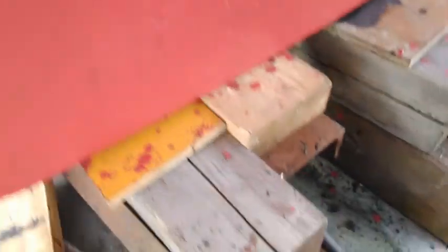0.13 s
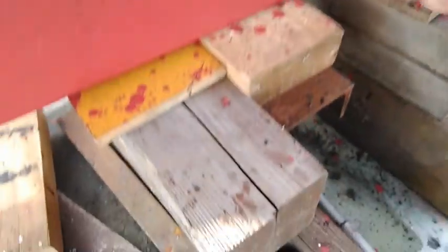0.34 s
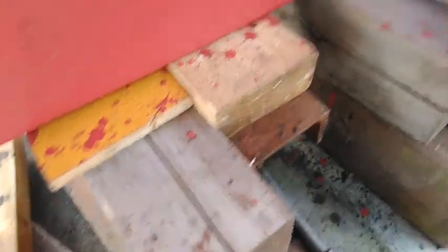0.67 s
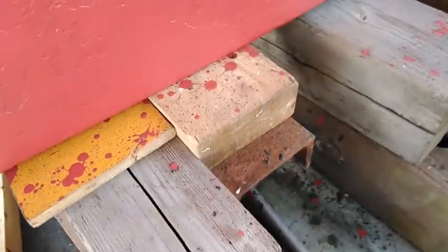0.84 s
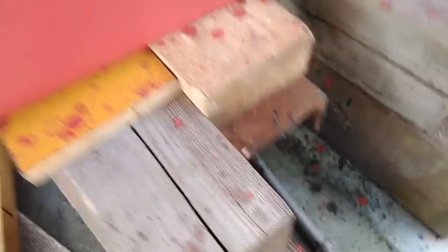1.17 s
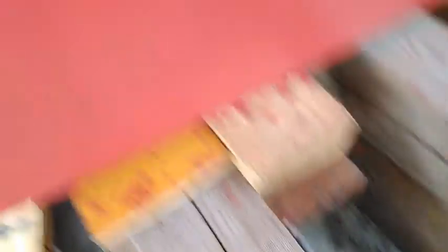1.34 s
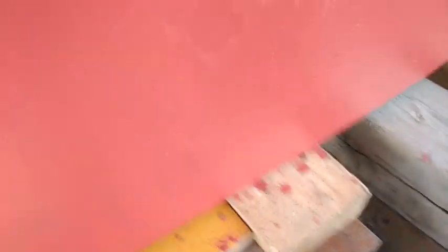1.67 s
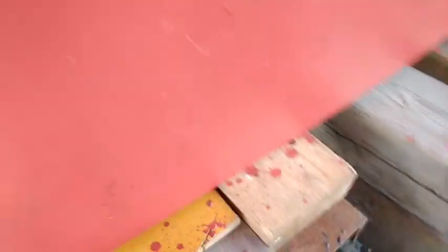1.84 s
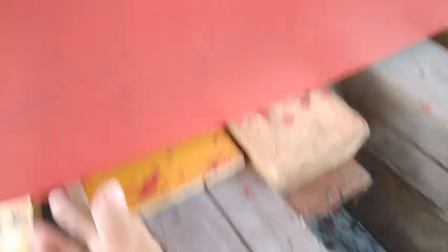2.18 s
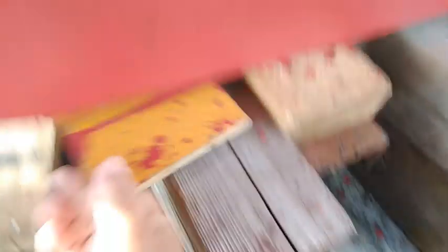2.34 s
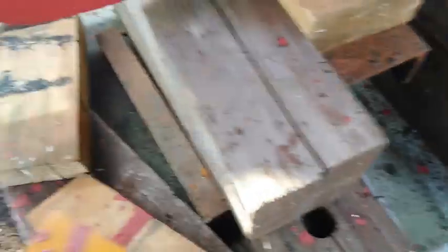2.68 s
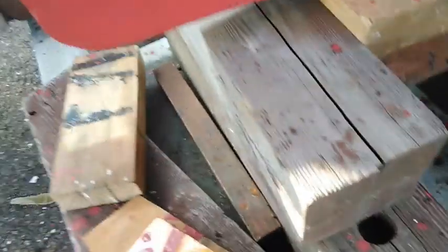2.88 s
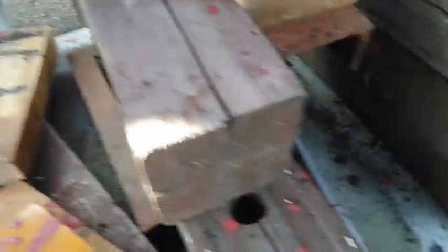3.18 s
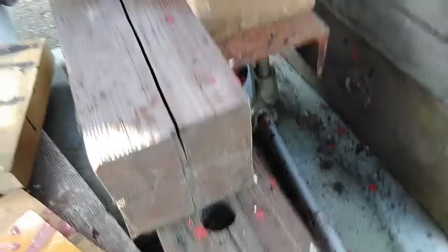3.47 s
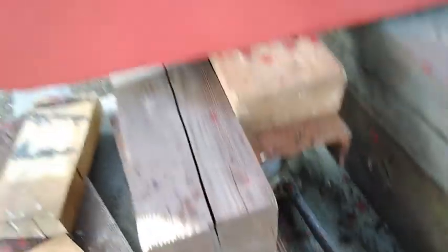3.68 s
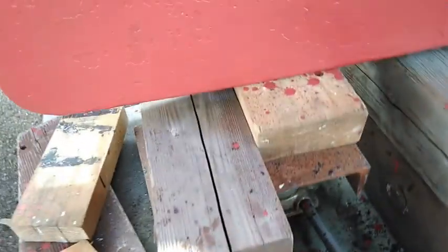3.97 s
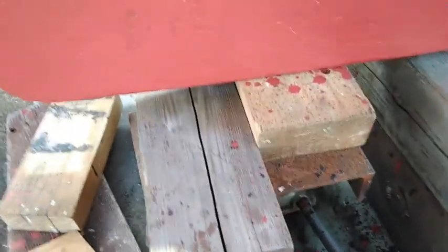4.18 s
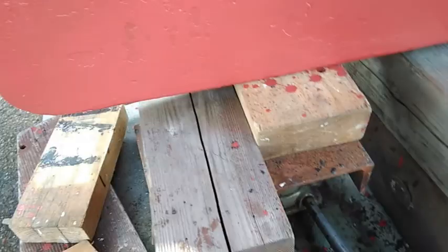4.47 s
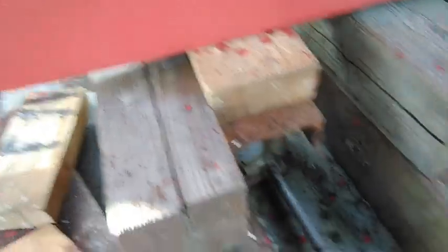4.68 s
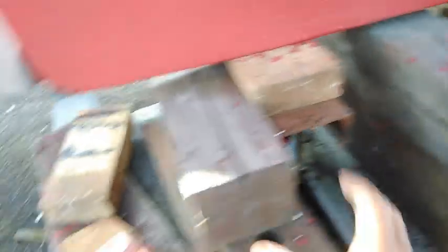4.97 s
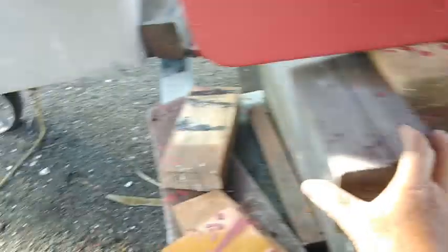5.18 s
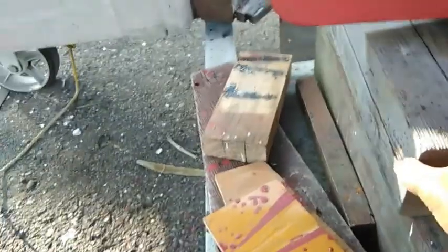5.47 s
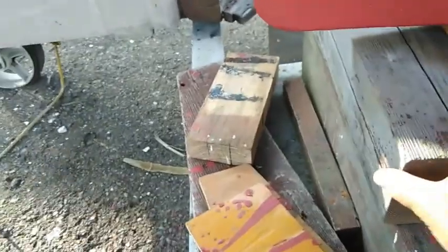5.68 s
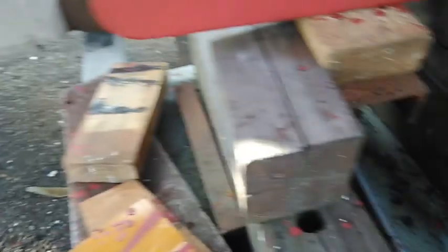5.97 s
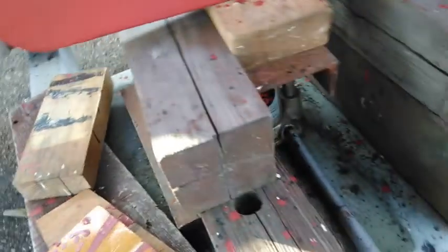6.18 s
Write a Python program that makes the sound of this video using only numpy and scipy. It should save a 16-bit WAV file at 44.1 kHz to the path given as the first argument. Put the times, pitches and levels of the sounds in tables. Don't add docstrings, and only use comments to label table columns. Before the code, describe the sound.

Close up in an open yard with faint traffic hum, wood grates in a short gritty slide, then two pairs of wooden knocks follow. Another scrape leads to a lighter knock and two loud, sharp cracks. After a pause with tiny taps, a block drops hard, bouncing in quickening clacks while a loose steel bolt pings. Soft low handling bumps close it.

```python
import sys
import numpy as np
from scipy import signal
from scipy.fft import rfft, irfft, next_fast_len
from scipy.io import wavfile
from scipy.ndimage import uniform_filter1d

SR = 44100
rng = np.random.default_rng(int(sys.argv[2]) if len(sys.argv) > 2 else 0)


def field_ratio(decibels):
    return 10 ** (np.asarray(decibels, dtype=float) / 20)


def generate_wav(signal):
    frames = np.transpose(np.atleast_2d(signal))
    scaled = np.clip(frames, -1, 1) * 32767
    pcm = np.round(scaled).astype(np.int16)
    wavfile.write(sys.argv[1], SR, pcm)


N = 279153

# frequency in Hz, level in dB per Hz.
YARD_SPECTRUM = [(15, -53.5), (25, -33), (48, -18), (62, -2), (82, -1), (168, -6.5), (355, -21.5),
                 (389, -16.5), (448, -22), (782, -20), (3160, -33.5), (3630, -36), (4920, -35.5),
                 (6500, -46.5), (8450, -81.5), (14300, -120)]
# time in seconds, level in dB.
TRAFFIC_SWELL = [(0, 2), (1.35, 0.5), (2.5, 1.5), (4.599, 1), (5.051, 4.5), (5.7, 3.5), (6.33, 3)]
HUM_DB, AIR_DB, AIR_SWELL = -68, -80, 1.5

# time in seconds, peak in dB, pitch in Hz, t60 in seconds.
SNAGS = [(0.029, -45.5, 1310, 0.033), (0.436, -51, 5400, 0.027), (0.469, -41, 4870, 0.023),
         (0.479, -36, 5010, 0.044), (0.507, -46, 3100, 0.037), (0.541, -37, 3100, 0.058),
         (0.595, -31, 870, 0.018), (0.578, -28, 2170, 0.034), (0.633, -25.5, 1600, 0.04),
         (0.658, -23, 1255, 0.043), (0.677, -38.5, 2170, 0.05), (0.966, -49, 3400, 0.045),
         (1.023, -56.5, 4600, 0.031), (2.042, -37, 2090, .03), (2.091, -36, 3960, 0.021),
         (2.138, -33.5, 2400, 0.033), (2.106, -28.5, 4480, 0.03), (2.17, -37, 1700, 0.027),
         (2.214, -42, 1690, 0.058), (2.226, -47, 4540, 0.027), (2.242, -47, 1580, 0.12),
         (4.195, -34.5, 2650, 0.025), (4.203, -37.5, 1200, 0.053), (4.216, -45, 1475, 0.052)]
# time in seconds,
# peak in dB, pitch in Hz, t60 in seconds.
CHIPS = [(1.691, -52.5, 2600, 0.035), (3.968, -50, 1430, 0.089), (1.779, -55.5, 462, 0.08),
         (2.008, -34, 1912, 0.04), (3.62, -61, 877, 0.081), (3.752, -58, 4590, 0.054),
         (3.753, -54.5, 3735, 0.14), (3.757, -66, 1303, 0.25), (3.966, -40.5, 2750, 0.025),
         (3.9675, -44, 1820, 0.058), (4.044, -46, 725, 0.045), (4.061, -58, 915, 0.064),
         (4.188, -45.5, 2693, 0.03), (4.198, -42.5, 1860, 0.085), (4.228, -55, 1700, 0.07),
         (4.255, -56, 1650, 0.058), (4.29, -60, 1750, .08), (2.951, -26, 740, 0.045), (2.82, -42, 820, .1),
         (4.097, -59, 513, 0.041), (2.39, -50, 800, 0.065), (2.418, -50, 806, 0.097),
         (2.415, -48, 2092, 0.062), (4.529, -65, 731.5, 0.038), (4.6942, -47, 5080, 0.053),
         (5.455, -59, 1760, 0.03), (5.47, -64, 2200, .03)]
# time in seconds, peak in dB, pitch in Hz, t60 in seconds.
CLINKS = [(4.7035, -7, 4980, .045), (4.7895, -10, 4130, .03), (4.79, -21, 6313, .03),
          (4.8428, -14.5, 2850, 0.037), (4.8768, -22.5, 5050, 0.02525), (4.8775, -30.5, 7600, .025),
          (4.9003, -24, 4460, 0.023), (4.901, -30.5, 6200, 0.022), (4.9168, -34.5, 7860, .05),
          (4.9172, -29, 3600, 0.046), (4.9395, -44, 4870, 0.021)]
SNAG_CLICK_DB, CHIP_CLICK_DB, CLINK_CLICK_DB = -4, -11, -9.5

# time in seconds, peak in dB, pitch in Hz, length in cycles.
BUMPS = [(0.169, -31.5, 90, 0.88), (0.196, -47.5, 71, 2.5), (0.383, -40.5, 261, 2.9),
         (0.411, -52.5, 180, 16), (2.434, -36, 173, 7.6), (2.458, -43, 173, 6.1), (2.48, -47.5, 185, 2.8),
         (2.373, -37, 198, 3.2), (2.412, -39.5, 275, 4.4), (2.431, -43.5, 320, 7.1),
         (5.613, -36.5, 81, 1.85), (5.637, -34, 153.1, 2.2), (5.653, -30, 70.6, 1.25),
         (5.717, -34, 86, 1.03), (5.764, -47, 80.1, 3.9), (5.812, -48, 104.6, 4.4),
         (5.87, -26.5, 100.9, 2.4), (5.868, -33.5, 190, 1.56), (5.881, -45.5, 260, 1.25),
         (0.648, -48.5, 168, 31), (1.151, -45, 178.5, 10.8), (5.906, -34, 100.4, 1.34),
         (1.791, -57, 289.5, 6.1), (2.209, -54, 314, 5.1)]

# frequency in Hz, width in Hz, level in dB.
SLIDE_MODES = [(463, 32, 1), (770, 75, -13), (895, 23, 1), (1154, 99, 4), (1650, 100, -1.5),
               (2170, 47, 3.5), (3073, 220, -6), (3440, 31, -24.5), (3794, 49, -20.5), (5060, 540, 0)]
# frequency in Hz, level in dB per Hz.
GRIT_SPECTRUM = [(71, -48), (120, -15), (169, -2), (403, -11.5), (465, -4.5), (1000, -12), (1200, -17.5),
                 (3100, -14), (9620, -29), (13800, -37.5), (15000, -60)]
# time in seconds, level in dB.
PUSH = [
    (0.43, -73),
    (0.44, -63.5),
    (0.484, -47),
    (0.55, -42.5),
    (0.582, -38),
    (0.61, -45),
    (0.664, -38.5),
    (0.684, -45),
    (0.702, -63),
]
PULL = [
    (1.96, -86),
    (1.99, -62.5),
    (2.012, -55),
    (2.05, -45),
    (2.142, -44),
    (2.166, -54.5),
    (2.2, -60),
    (2.245, -58.5),
    (2.3, -75),
]
# hollow low modes in dB, body modes in dB, grit in dB,
# growth of the low layers as weight settles in dB per second.
PUSH_ON = (-13.5, -15.5, -19.5, 53.5)
PULL_ON = (-46, -1, -16, -16)
# start in seconds, length in seconds, level in dB, low modes in dB, grit in dB.
BRUSHES = [(0.43, 0.063, -72.5, -21, -20), (0.707, 0.19, -68, -4.5, -14), (0.98, 0.089, -61, -9, -12),
           (1.1, .035, -71, -10, -5.5), (0.78, 0.016, -69.5, -6.5, -0.5), (2.355, .06, -52, 4, -13.5),
           (1.9, .11, -63, -4, -13), (5.0, 0.32, -74.5, 2, -30), (4.704, 0.095, -53.5, -19.5, 6),
           (4.792, 0.17, -56.5, -19, 3), (2.755, 0.11, -63.5, -30.5, -17.5),
           (5.635, 0.066, -64.5, -3.5, -9.5), (5.687, 0.064, -70, -6, 1), (5.75, 0.1, -81, -6, -2.5),
           (8.6, 0.065, -76.5, 3.5, -25), (4.6, .05, -76, 12.5, -25), (3.975, 0.11, -72.5, -7, -28),
           (2.925, 0.066, -54.5, -30, -25), (2.5, .045, -68.5, -32, -16.5)]
GRIP_DB = -8.5
BRUSH_RISE_S, BRUSH_FADE_DB = 0.0092, -11.5

# time in seconds, peak in dB, hardness as treble tilt in dB per octave,
# ring time factor, first crack over the ring in dB.
WEDGE_KNOCKS = [
    (.8875, -14.5, 2, 1.08, 4.5),
    (.8955, -21.5, 1.5, 0.57, 2.5),
    (.908, -26, -5, 0.72, 6),
    (.924, -31, -8, 1.2, 2.5),
]
BEAM_KNOCKS = [
    (1.0565, -14, -0.5, 1, 1),
    (1.0615, -14, -1, 0.87, 0),
    (1.078, -26, -3, 1, 0),
    (1.092, -28.5, -6, 0.88, 0.069),
    (1.109, -35, -2.5, 1, 0),
]
SHIM_KNOCKS = [
    (2.3205, -19, -0.5, 0.82, 5.7),
    (2.3295, -21.5, 0, 0.91, 4),
    (2.344, -24, 0.8, 1, 3.2),
    (2.361, -30, -2.5, 0.87, 2.3),
    (2.378, -48, -0.5, 0.74, 2.7),
    (2.414, -54, -22, 1, 3.4),
]
PLANK_KNOCKS = [
    (2.7438, -1.5, 1.5, 1, 6.9),
    (2.766, -23.5, -2, .8, 2),
    (2.777, -26.5, -5, .8, 2.1),
    (2.7925, -23, -5, .6, 2.5),
    (2.81, -39.5, -0.5, .6, 2),
]
BLOCK_KNOCKS = [
    (2.9186, -24.5, -4, .4, 2),
    (2.92, -3, 2, 0.87, 6.3),
    (2.9312, -17.5, -2.5, 0.98, 2),
    (2.9425, -23, -2, 0.86, 1),
    (2.952, -26, -3, 0.83, 1),
]
DROP_KNOCKS = [
    (4.7038, -1.5, 3, 1.6, 3.1),
    (4.7085, -5, 0, 1.2, 2),
    (4.7145, -4, 0, 1.33, 2.3),
    (4.7275, -12.5, 0.5, 2.3, 2),
    (4.744, -16.5, -1, 1.5, 1),
    (4.758, -22, 0.5, 1.9, 1),
]
STACK_KNOCKS = [
    (4.7893, -4.5, 2.5, 1.67, 2.6),
    (4.797, -10, -1.5, 2.5, 1),
    (4.807, -14, -2, 1.6, 1),
    (4.8425, -4.5, 5.5, 1.36, 2.2),
    (4.853, -14, -0.5, 1.37, 1.2),
    (4.8765, -12.5, 1, 2.7, 2.1),
    (4.9003, -16.5, -2, 1.76, 1.9),
    (4.9175, -18, -1.5, 1.55, 1),
    (4.9395, -22.5, -3, 0.95, 2.7),
    (4.953, -28, -5.5, 1, 2.6),
]

# frequency in Hz, level in dB, t60 in seconds.
WEDGE_MODES = [(197.6, -28, 0.23), (436, -4, .1), (540, -13, .22), (597, -9.5, 0.24), (738, -11, .2),
               (870, 4, .05), (1160, 2, 0.068), (1274, -9, .06), (1700, -9.5, 0.078), (2200, -17, 0.06),
               (2400, -26, 0.058)]
BEAM_MODES = [(467.4, -10, 0.14), (586, -32.5, 0.23), (741.7, 12, 0.081), (816, -16, 0.074),
              (1160, -5.5, 0.06), (883, -9, 0.09), (1580, -4.5, .04), (2010, -5.5, 0.028),
              (2473, -26.5, 0.054)]
SHIM_MODES = [(450, 1.5, 0.067), (838.5, -9, .07), (1079, -8.5, 0.079), (1590, 3, 0.0407),
              (1879, -7.5, .05), (2270, -5, 0.073), (3310, -26, 0.09), (3930, -15, 0.069),
              (4560, -13, 0.049)]
PLANK_MODES = [(320, -15.5, 0.19), (614, -14, .18), (749, -13, .15), (822, -21.5, .3), (1048, -13, .13),
               (1230, -6.5, .11), (1275, 9, 0.065), (1396, -2.5, 0.035), (1992, 3.5, .025),
               (2230, -1, 0.04), (3200, -24, .08), (3900, -25, .08)]
BLOCK_MODES = [(330, -11, 0.1), (590, -14, 0.17), (705, -6.5, .12), (816, -8, 0.29), (1023, 8, 0.062),
               (1100, -9.5, .1), (1242, 0, 0.079), (1400, -4.5, .07), (1520, -5, 0.055), (1840, 0.5, 0.072),
               (2143, 3.5, 0.027), (2530, -12.5, .06), (3650, -14, .06)]
DROP_MODES = [(436.2, -4, .25), (545.7, -7.5, 0.14), (725, -4.5, .12), (903, -5, 0.13), (973.7, 2, .25),
              (1196, -2, 0.16), (1420, 1.5, .14), (1636, -6, .15), (1890, -6.5, 0.19), (2074, -5, .11),
              (2350, -11, .16), (3019, -14, .12), (3564, -8, .09), (5000, -7.5, .06)]
STACK_MODES = [(442.8, -3.5, 0.24), (492, -8.5, 0.26), (702.4, -2, 0.11), (897, -5.5, 0.15), (982, 2, 0.3),
               (1178, -6, 0.14), (1416, -0.5, 0.1005), (1600, -9.5, 0.093), (1685, -7.5, 0.13),
               (1807, -10, 0.16), (2064, -11.5, 0.14), (2724, -8.5, 0.12), (2995, -16, .1),
               (4000, -8.5, 0.04)]
# frequency in Hz, level in dB per Hz.
WEDGE_COLOUR = [(47, -50.5), (80, 0.5), (584, 9), (1000, 4.5), (1190, -16), (1760, -18.5), (1960, -30),
                (2230, -16.5), (2650, -23), (14000, -64)]
BEAM_COLOUR = [(47, -59), (80, -22.5), (203, -17.5), (651, -13.5), (741, -12.5), (825, -12.5), (1170, -20),
               (2000, -29), (6710, -73), (14000, -91)]
SHIM_COLOUR = [(47, -53), (80, -4.5), (451, 6.5), (1220, -20.5), (1580, -2.5), (2330, -4.5), (2830, -13.5),
               (4360, -5.5), (9700, -34), (14000, -41)]
PLANK_COLOUR = [(47, -45.5), (80, -21), (584, -9), (1120, -2.5), (1240, -1), (1800, -17), (2230, -12.5),
                (2710, -25.5), (3910, -24.5), (14000, -85)]
BLOCK_COLOUR = [(47, -57.5), (80, -35.5), (299, -9.5), (461, -9), (680, -3), (1120, -8), (1240, -5.5),
                (1920, -4.5), (7810, -59), (14000, -81.5)]
STACK_COLOUR = [(47, -65), (80, -38), (418, -11), (845, -10), (986, -5.5), (1280, -9.5), (3540, -20.5),
                (3860, -18), (4410, -19), (11600, -56.5), (15500, -68.5)]
# frequency in Hz, t60 in seconds.
WOOD_T60 = [(100, .25), (400, 0.26), (1000, 0.14), (2500, 0.11), (6000, 0.074), (14000, 0.021)]
# time in seconds, damping in dB per second.
SETTLE = (4.962, 170)
# frequency in Hz, level in dB, t60 in seconds.
GROUND_MODE = (80, -75.5, 0.24)

# first note in seconds, notes per second, top in Hz, fall in Hz, note length in seconds.
TRILL = (1.14, 15.05, 3900, 430, .036)
# time in seconds, level in dB.
TRILL_SWELL = [(1.1, -88), (1.35, -83), (1.5, -78), (1.7, -79), (2.0, -82)]

# time in seconds, strength in dB, share of the lowest bending mode in dB,
# sharpness in dB per octave.
BOUNCES = [
    (4.704, -22, -21, -4.5),
    (4.790, -18.5, -3.5, 2.5),
    (4.842, -19, -33, 10),
    (4.876, -25.5, -10.5, 4.5),
    (4.9, -26.5, -10, -1),
    (4.917, -43.5, 9, 3),
    (4.9395, -63, -2, 8),
]
BOLT_HZ = [3478, 4272, 8590, 12860, 12110]
BOLT_T60_S = [.5, 0.086, 0.17, 0.081, .12]
BOLT_DB = [2, -2, -21, -26, -43.5]
# frequency in Hz, level in dB, t60 in seconds.
FRAME_MODES = [(793.6, -42.5, 0.58), (1000, -57.5, .35)]


def evened(x):
    return x / np.sqrt(np.mean(x ** 2) + 1e-20)


def read(points, hz):
    f, value = np.transpose(points)
    return np.interp(np.log(hz + 1), np.log(f + 1), value)


def add(mix, s, sound):
    part = mix[round(s * SR):][:len(sound)]
    part += sound[:len(part)]


def band(x, lo_hz, hi_hz):
    return evened(signal.sosfilt(signal.butter(4, [lo_hz, hi_hz], "band", fs=SR, output="sos"), x))


def rings(hz, t60_s, t):
    decay = np.exp(-np.log(1000) * t / np.maximum(t60_s, .004)[:, None])
    return np.sin(2 * np.pi * np.outer(hz, t)) * decay


def drifting_patches(shape, bins, frames):
    smooth = uniform_filter1d(rng.standard_normal(shape), size=bins, axis=0)
    return evened(uniform_filter1d(smooth, size=frames, axis=1))


def yard(patchy_db=2.4, flicker_db=.7):
    frames, hz = N // 256 + 5, np.fft.rfftfreq(1024, 1 / SR)
    real, imag = rng.standard_normal((2, 513, frames))
    patches = drifting_patches((513, frames), bins=14, frames=10)
    flicker = evened(uniform_filter1d(rng.standard_normal(frames), size=8))
    colour_db = read(YARD_SPECTRUM + [(16000, -90)], hz)[:, None]
    z = (real + 1j * imag) * field_ratio(colour_db + patchy_db * patches + flicker_db * flicker)
    noise = signal.istft(z, nperseg=1024, noverlap=768)[1][:N]
    hum = signal.sosfiltfilt(signal.butter(2, 380, fs=SR, output="sos"), noise)
    swell_db = np.interp(np.arange(N) / SR, *np.transpose(TRAFFIC_SWELL))
    air = field_ratio(AIR_DB + AIR_SWELL * swell_db) * evened(noise - hum)
    return field_ratio(HUM_DB + swell_db) * evened(hum) + air


def taps(rows, click_db, octaves):
    out, t = np.zeros(N), np.arange(4000) / SR
    place = np.linspace(-1, 1, 7)
    for s, peak_db, hz, t60_s in rows:
        spread = np.clip(0.00019 / t60_s ** 2, .004, .2)
        cluster_hz = hz * (1 + spread * (place + rng.uniform(-0.066, 0.14, 7)))
        lasts_s = t60_s * rng.uniform(.5, 1.2, 7)
        tone = (rng.uniform(0.53, 1, 7) * field_ratio(-7 * abs(place))) @ rings(cluster_hz, lasts_s, t)
        lo_hz, hi_hz = max(hz / 2 ** octaves, 500), min(hz * 2 ** octaves, 9000)
        click = band(rng.standard_normal(len(t)), lo_hz, hi_hz)
        click *= field_ratio(-60 * t / (0.18 * t60_s)) + field_ratio(-13 - 60 * t / (3 * t60_s))
        tap = evened(tone) + field_ratio(click_db) * evened(click)
        tap *= (1 - np.exp(-t * hz / 3.0)) * (1 - t / t[-1])
        add(out, s, field_ratio(peak_db) * tap / abs(tap).max())
    return out


def bumps():
    out = np.zeros(N)
    for s, peak_db, hz, cycles in BUMPS:
        t = np.arange(-cycles / hz, cycles / hz, 1 / SR)
        swell = np.exp(-(2.83 * t * hz / cycles) ** 2)
        add(out, s + t[0], -field_ratio(peak_db) * np.cos(2 * np.pi * hz * t) * swell)
    return out


def rubbing(clock, slips_per_s=7000, spread_db=3.0, body_db=5, judder_db=1.45, patchy_db=4):
    sizes = field_ratio(spread_db * np.minimum(rng.exponential(1, N), 4))
    slips = rng.choice([-1., 1.], N) * sizes * (rng.random(N) < slips_per_s / SR)
    slips = evened(slips) + 0.23 * rng.standard_normal(N)
    slips *= field_ratio(judder_db * band(rng.standard_normal(N), 29.0, 90))
    size = next_fast_len(N)
    hz = np.fft.rfftfreq(size, 1 / SR)
    modes = sum(field_ratio(db) / (1 + 2j * (hz - f) / width) for f, width, db in SLIDE_MODES)
    grain = rfft(slips, size) * field_ratio(read(GRIT_SPECTRUM, hz))
    held = (clock > PULL[0][0]) & (clock < PULL[-1][0])
    rub = irfft(grain, size)[:N] + field_ratio(body_db + held * GRIP_DB) * irfft(grain * modes, size)[:N]
    z = signal.stft(rub, nperseg=256, noverlap=192)[2]
    z = z * field_ratio(patchy_db * drifting_patches(z.shape, bins=2, frames=20))
    return signal.istft(z, nperseg=256, noverlap=192)[1][:N]


def slides():
    clock = np.arange(N) / SR
    rub = rubbing(clock)
    hollow, body = band(rub, 150, 610), band(rub, 780, 1500)
    mid, grit = band(rub, 1500, 5600), band(rub, 7000, 21000)
    sand = uniform_filter1d(uniform_filter1d(rng.standard_normal(N), size=900), size=900)
    grit = grit * field_ratio(4 * evened(sand))
    out = np.zeros(N)
    for curve, (hollow_db, wood_db, grit_db, settle_db_per_s) in [(PUSH, PUSH_ON), (PULL, PULL_ON)]:
        s, level_db = np.transpose(curve)
        moving = np.clip(np.minimum(clock - s[0], s[-1] - clock) / 0.0047, 0, 1)
        settled = field_ratio(settle_db_per_s * np.clip(clock - s[0], 0, s[-1] - s[0]))
        low = settled * (field_ratio(hollow_db) * hollow + field_ratio(wood_db) * body)
        out += moving * field_ratio(np.interp(clock, s, level_db)) * (mid + low + field_ratio(grit_db) * grit)
    for start_s, length_s, level_db, low_db, grit_db in BRUSHES:
        t = clock - start_s
        moving = np.clip(np.minimum(t / BRUSH_RISE_S, 3 - 3 * t / length_s), 0, 1)
        moving *= field_ratio(level_db + BRUSH_FADE_DB * np.clip(t / length_s, 0, 1))
        out += moving * (mid + field_ratio(low_db) * (hollow + body) + field_ratio(grit_db) * grit)
    return out


def crowd(colour, tilt_db, ring, t, count=12):
    hz = np.fft.rfftfreq(len(t), 1 / SR)
    place = np.log(np.maximum(hz, 60) / 60) / np.log(16000 / 60) * (count - 1)
    shares = np.clip(1 - abs(place - np.arange(count)[:, None]), 0, 1)
    colour_db = read(colour, hz) + tilt_db * np.log2((hz + 1) / 1000)
    spectrum = rfft(rng.standard_normal(len(t))) * field_ratio(colour_db)
    t60_s = read(WOOD_T60, np.geomspace(60, 16000, count))[:, None] * ring
    bands = irfft(spectrum * shares, len(t)) * np.exp(-np.log(1000) * t / t60_s)
    return (bands / np.sqrt(t60_s)).sum(0)


def knocks(rows, modes, colour, dense_db, crack_t60_s=0.076):
    out, t = np.zeros(N), np.arange(7200) / SR
    hz, db, t60_s = np.transpose(modes)
    twin_hz = hz * rng.uniform(1.0, 1.02, len(hz))
    for s, peak_db, tilt_db, ring, crack_db in rows:
        touch_db = rng.normal(0, 1.9, len(hz))
        lasts_s = np.minimum(t60_s, .22) * ring
        pairs = rings(hz, lasts_s, t) + .45 * rings(twin_hz, lasts_s, t)
        clear = field_ratio(db + touch_db + tilt_db * np.log2(hz / 1000)) @ pairs
        blow = evened(clear) + field_ratio(dense_db) * evened(crowd(colour, tilt_db, ring, t))
        blow *= (1 - np.exp(-t / 0.00027)) ** 2 * (1 + field_ratio(crack_db - 60 * t / crack_t60_s))
        blow *= np.minimum(4 - 4 * t / t[-1], 1)
        add(out, s, field_ratio(peak_db) * blow / abs(blow).max())
    return out


def ground(x):
    hz, db, t60_s = GROUND_MODE
    thud = field_ratio(db) * rings([hz], np.array([t60_s]), np.arange(SR // 4) / SR)[0]
    return signal.fftconvolve(abs(x), thud)[:N]


def hull_echo(x, t60_s=.45, dull_hz=3000):
    tail = np.zeros(SR // 2)
    at = np.arange(300, len(tail) - 20, 20)
    tail[at + rng.integers(0, 20, len(at))] = rng.choice([-1., 1.], len(at))
    tail = signal.lfilter(*signal.butter(1, dull_hz, fs=SR), tail)
    tail *= field_ratio(-60 * np.arange(len(tail)) / SR / t60_s)
    return signal.fftconvolve(x, tail / np.linalg.norm(tail))[:N]


def bird():
    first_s, per_s, top_hz, fall_hz, length_s = TRILL
    out, t = np.zeros(N), np.arange(0, length_s, 1 / SR)
    phase = 2 * np.pi * np.cumsum(top_hz - fall_hz * t / length_s) / SR
    note = np.sin(phase) * np.sin(np.pi * (t / length_s) ** 2.0)
    for s in first_s + np.arange(13) / per_s:
        level_db = np.interp(s, *np.transpose(TRILL_SWELL)) + rng.normal(0, 1.6)
        add(out, s, field_ratio(level_db) * note)
    return out


def dropped_block():
    landing = knocks(DROP_KNOCKS, DROP_MODES, STACK_COLOUR, dense_db=-1.5)
    bounces = knocks(STACK_KNOCKS, STACK_MODES, STACK_COLOUR, dense_db=-2.5)
    settle_s, damping_db_per_s = SETTLE
    return (landing + bounces) * field_ratio(-damping_db_per_s * np.maximum(np.arange(N) / SR - settle_s, 0))


def bolt():
    out, hz, t60_s = np.zeros(N), np.array(BOLT_HZ), np.array(BOLT_T60_S)
    spin_depth = np.array([[.05], [.3], [.6], [.6], [.6]])
    landings_s = [row[0] for row in BOUNCES[1:]] + [4.97]
    for (s, strength_db, bend_db, sharp_db), landing_s in zip(BOUNCES, landings_s):
        t = np.arange(0, landing_s - s, 1 / SR)
        mode_db = strength_db + np.array(BOLT_DB) + bend_db * (hz == hz[0])
        mode_db = mode_db + sharp_db * np.log2(hz / hz[1])
        spin = 1 + spin_depth * np.sin(2 * np.pi * (55 * t + rng.random((len(hz), 1))))
        edges = np.clip((t[-1] - t) / 0.0043, 0, 1) * (1 - np.exp(-t / 0.00056))
        add(out, s, field_ratio(mode_db) @ (rings(hz, t60_s, t) * spin) * edges)
    return out


def frame(x):
    hz, db, t60_s = np.transpose(FRAME_MODES)
    ring = field_ratio(db - 17.5) @ rings(hz, t60_s, np.arange(SR // 2) / SR)
    return signal.fftconvolve(x, ring)[:N]


def scene():
    dropped = dropped_block()
    wood = knocks(WEDGE_KNOCKS, WEDGE_MODES, WEDGE_COLOUR, dense_db=1.0)
    wood += knocks(BEAM_KNOCKS, BEAM_MODES, BEAM_COLOUR, dense_db=-4.5)
    wood += knocks(SHIM_KNOCKS, SHIM_MODES, SHIM_COLOUR, dense_db=1.0)
    wood += knocks(PLANK_KNOCKS, PLANK_MODES, PLANK_COLOUR, dense_db=-3.0, crack_t60_s=0.064)
    wood += knocks(BLOCK_KNOCKS, BLOCK_MODES, BLOCK_COLOUR, dense_db=-4.5, crack_t60_s=0.042)
    wood += dropped
    wood = signal.sosfilt(signal.butter(3, 150, "high", fs=SR, output="sos"), wood)
    near = wood + bolt() + slides()
    near += taps(SNAGS, SNAG_CLICK_DB, octaves=1.43)
    near += taps(CHIPS, CHIP_CLICK_DB, octaves=.7)
    near += taps(CLINKS, CLINK_CLICK_DB, octaves=.4)
    far = bird()
    echo = hull_echo(field_ratio(-45.0) * near + field_ratio(-14) * far)
    return (near + echo + frame(dropped) + ground(wood) + bumps() + far + yard())[None]


def low_pass(x):
    return signal.sosfilt(signal.butter(12, 15630, fs=SR, output="sos"), x)


def record(dry):
    heard = signal.sosfilt(signal.butter(3, 45, "high", fs=SR, output="sos"), dry)
    heard = heard / (1 + (heard / .95) ** 6) ** (1 / 6)
    heard = signal.sosfilt(signal.butter(8, 14300, fs=SR, output="sos"), heard)
    return low_pass(heard)


dry = scene()
out = record(dry)
generate_wav(out)
```